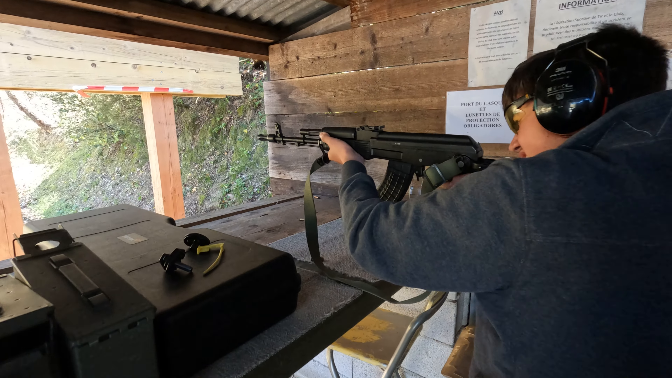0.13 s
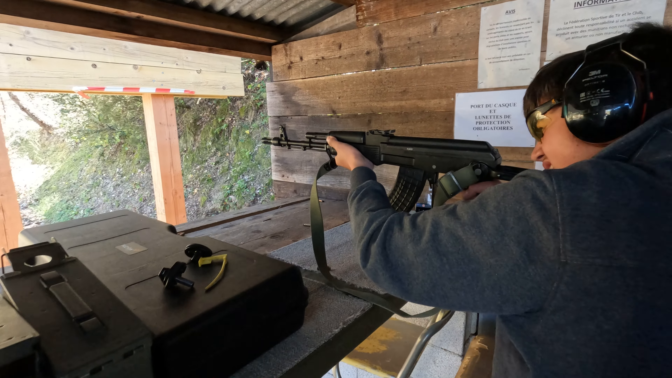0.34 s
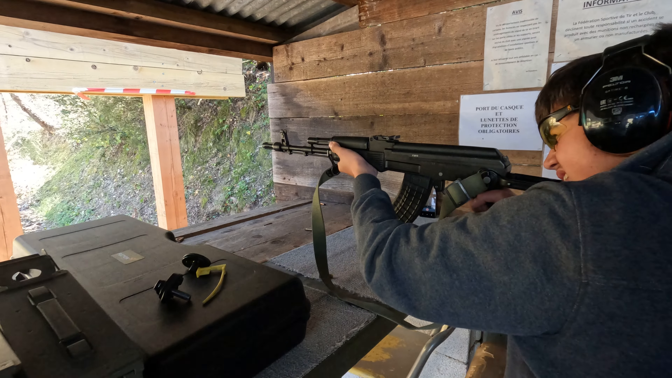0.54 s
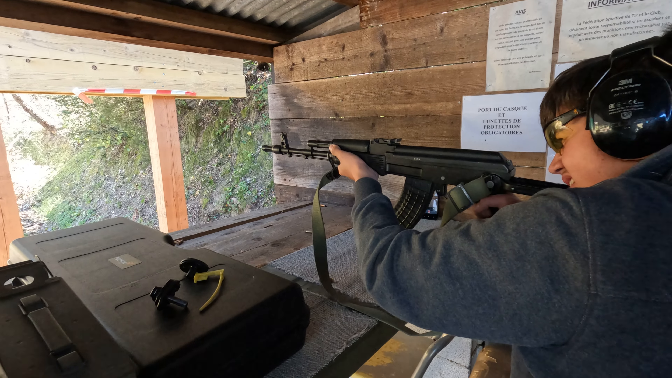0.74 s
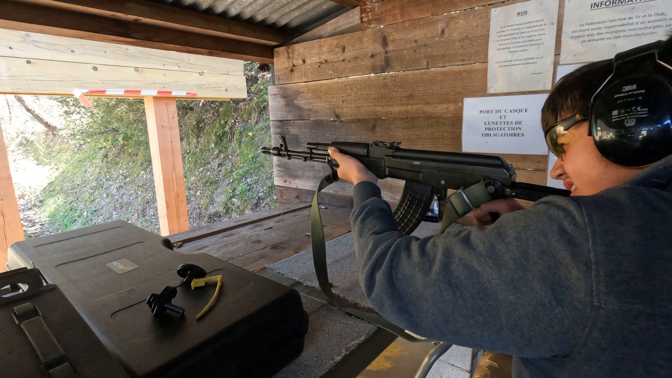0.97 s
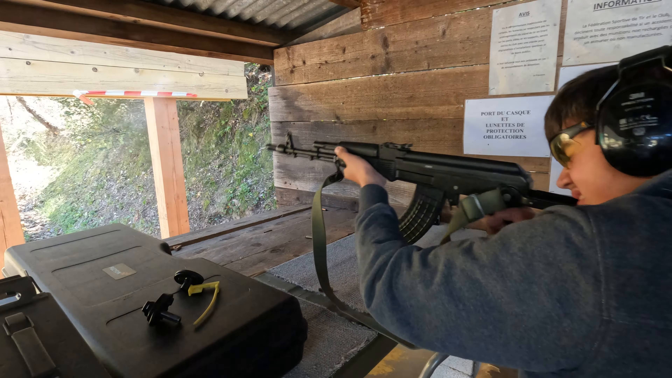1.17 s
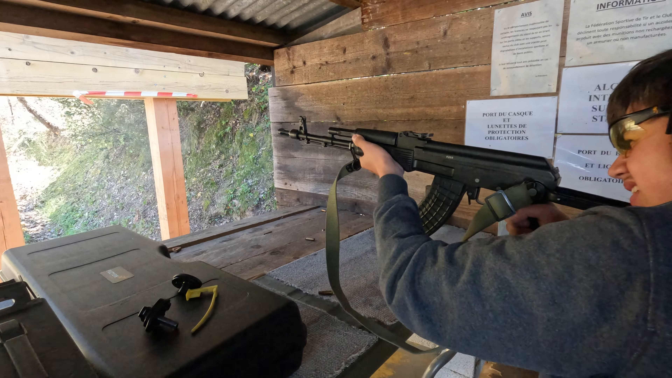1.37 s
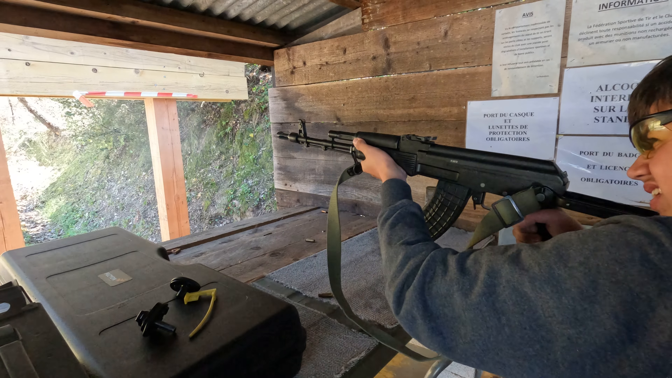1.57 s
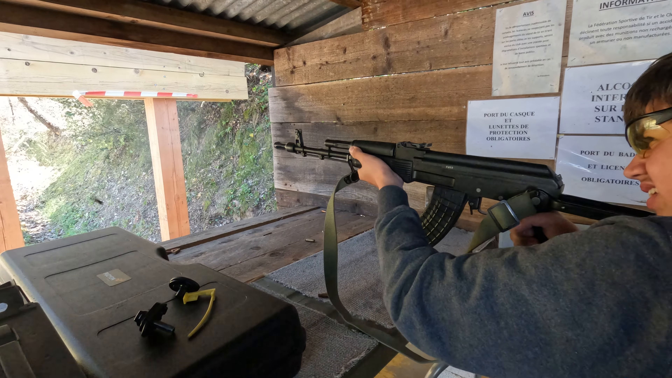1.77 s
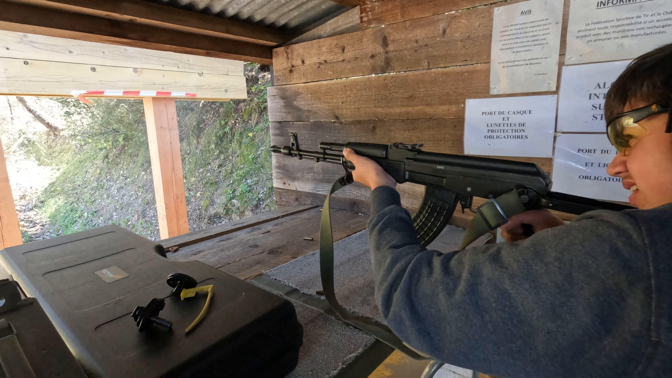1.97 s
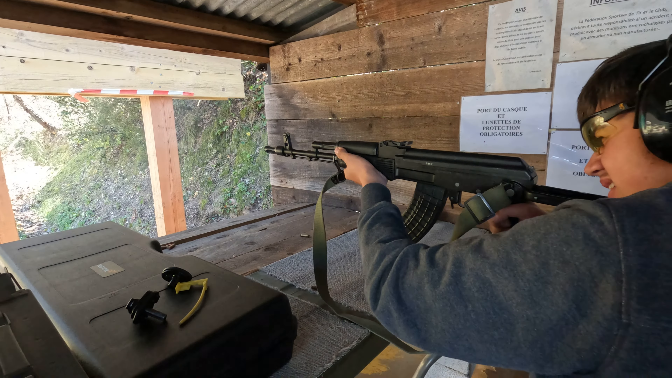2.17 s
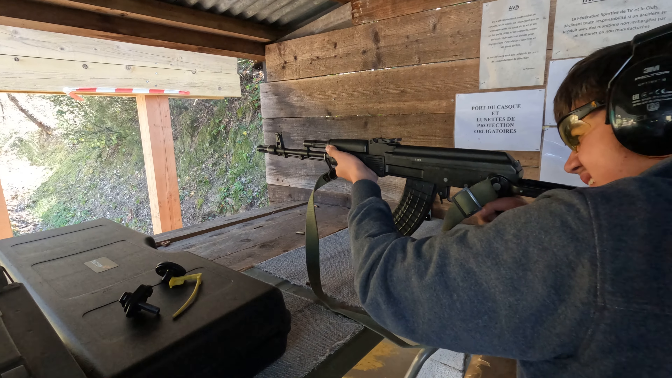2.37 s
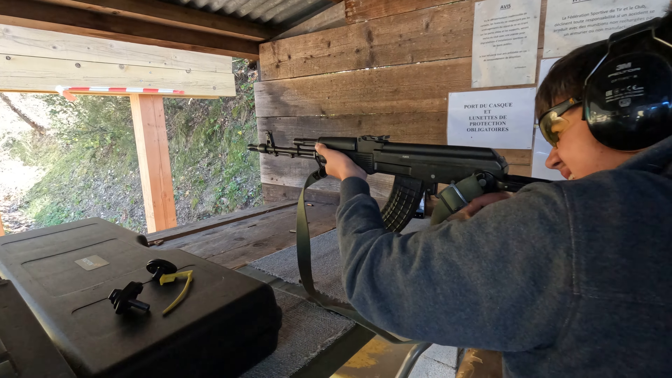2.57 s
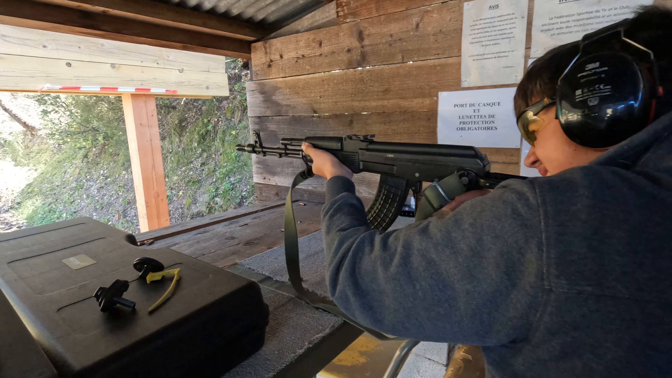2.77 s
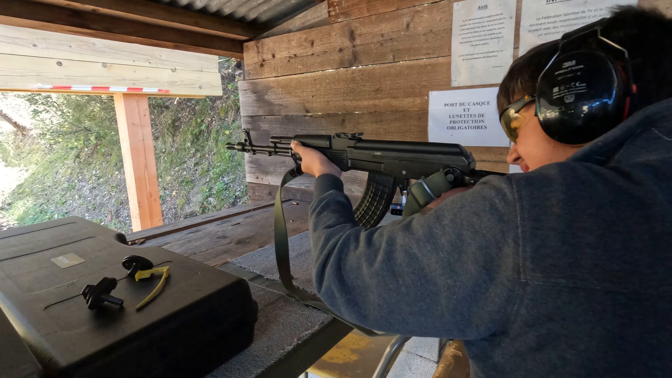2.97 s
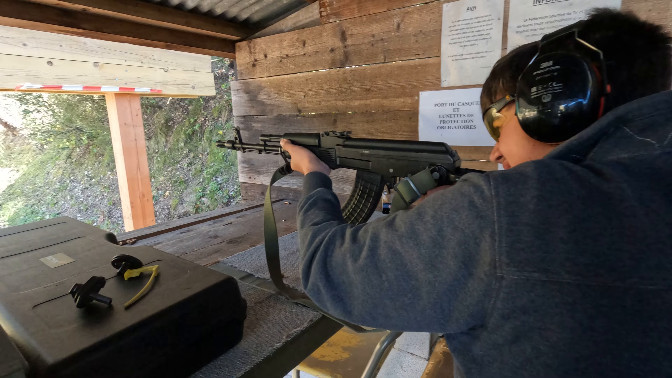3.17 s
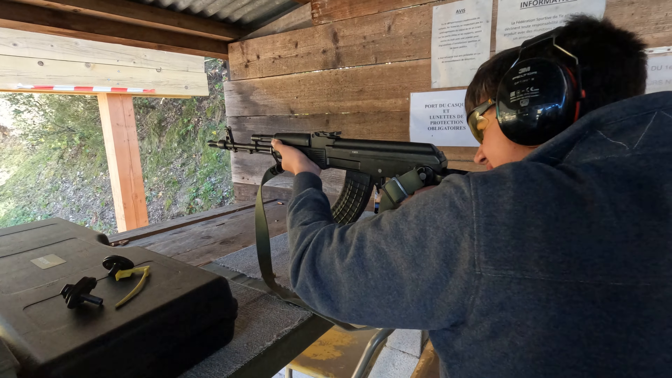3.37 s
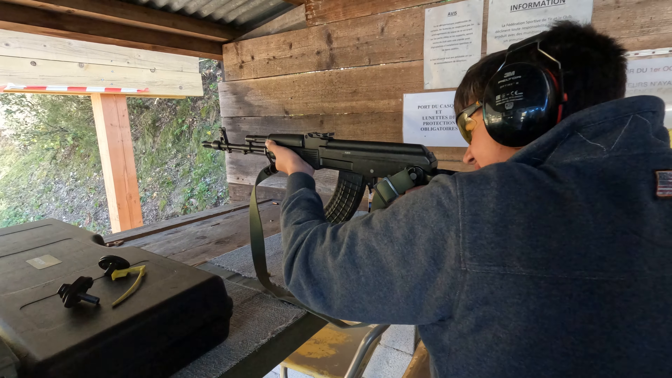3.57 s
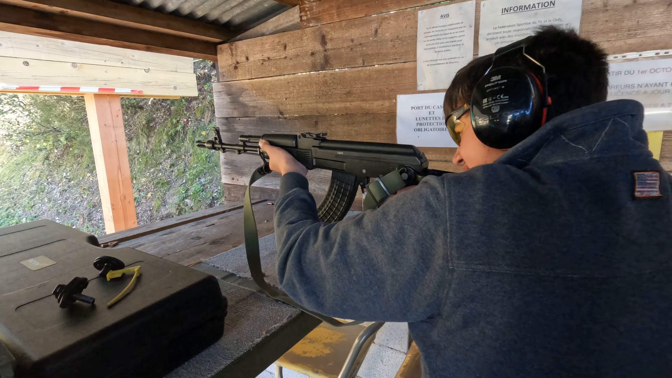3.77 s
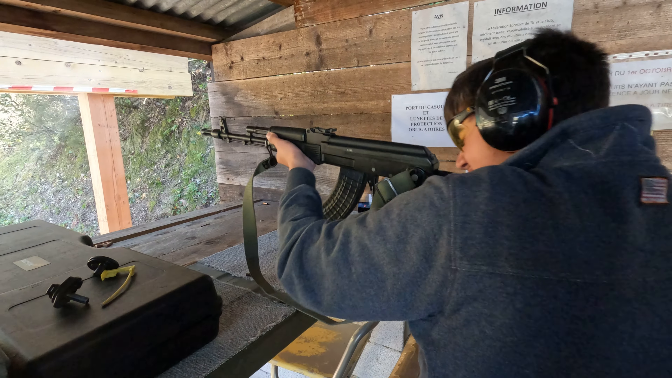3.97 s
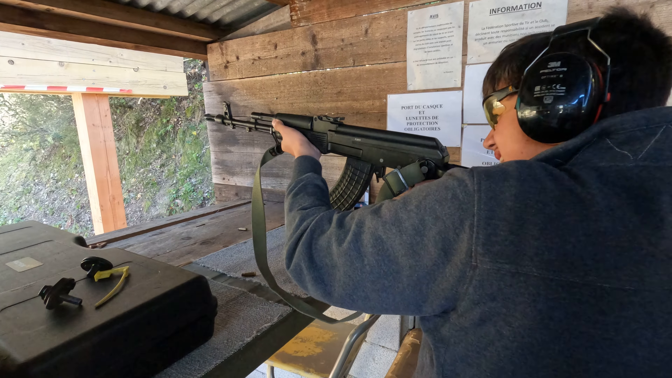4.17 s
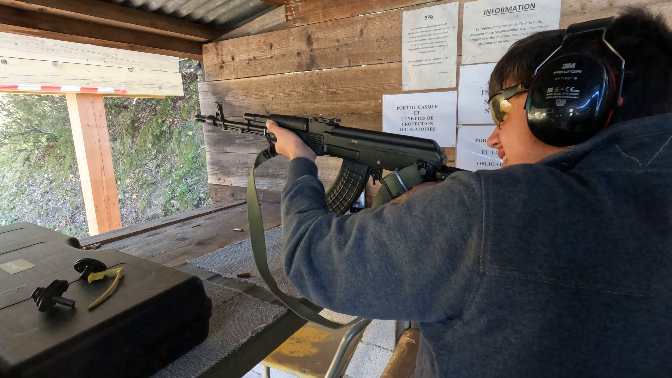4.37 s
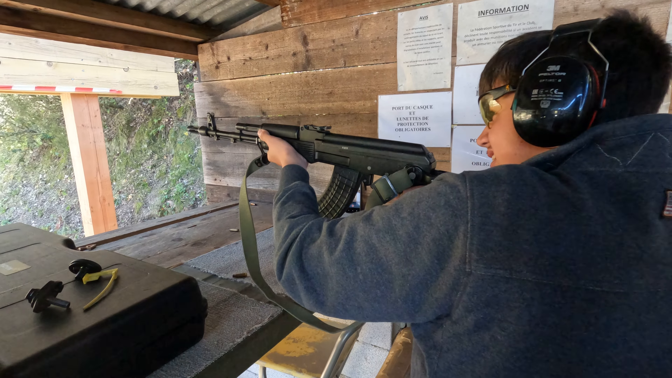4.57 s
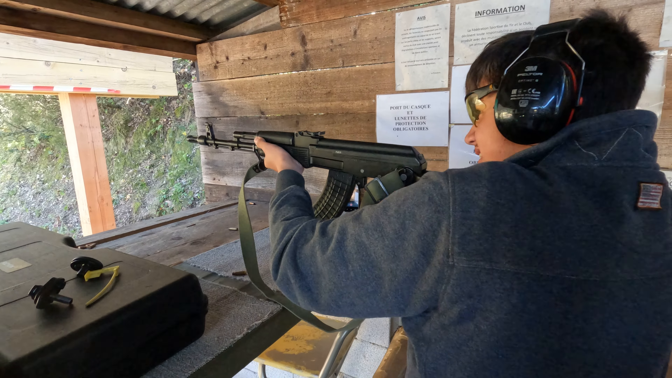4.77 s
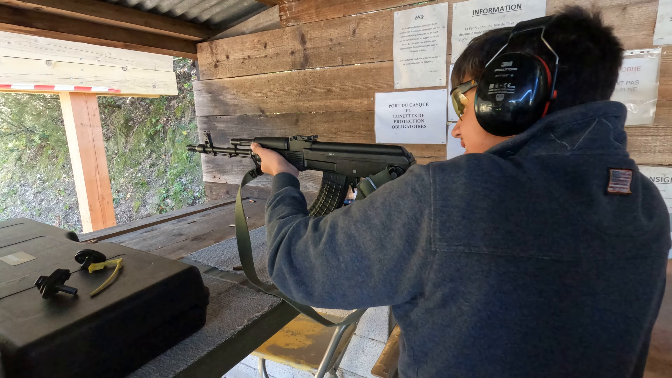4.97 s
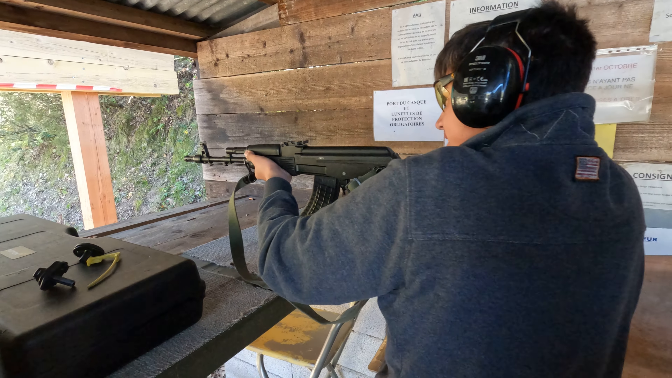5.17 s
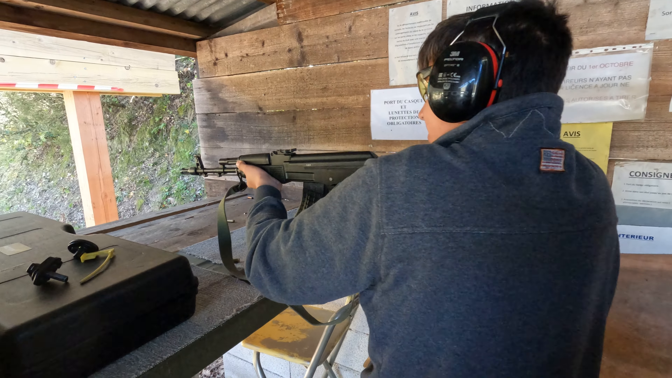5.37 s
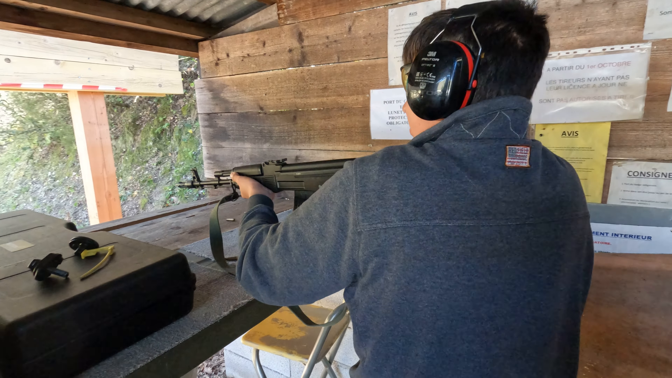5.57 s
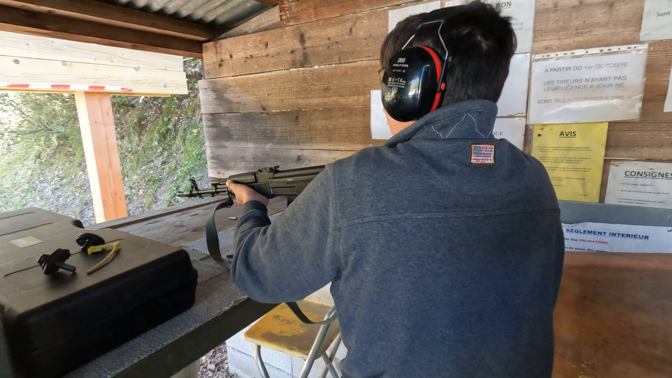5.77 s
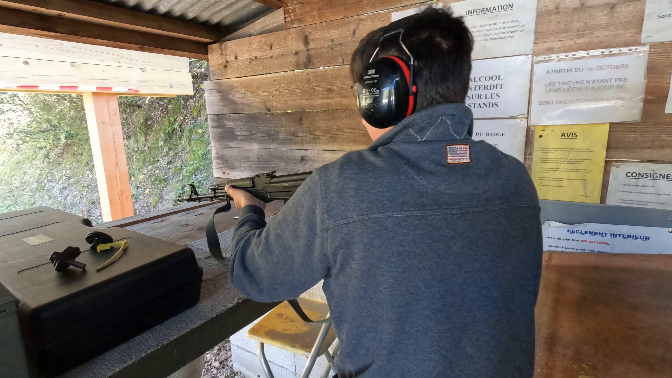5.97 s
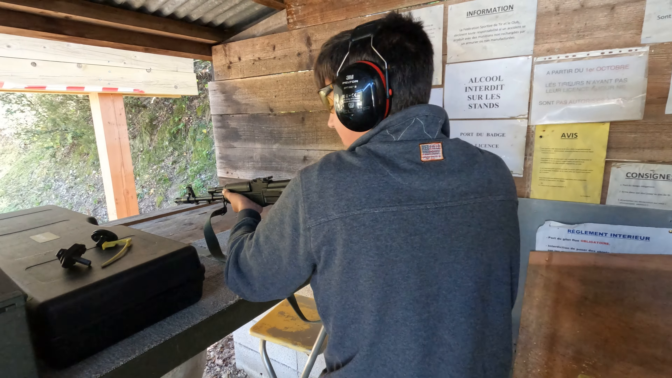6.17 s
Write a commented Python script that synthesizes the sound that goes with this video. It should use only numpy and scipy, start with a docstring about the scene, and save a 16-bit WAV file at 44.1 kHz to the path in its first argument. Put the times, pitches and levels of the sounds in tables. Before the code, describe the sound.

Two deafening rifle blasts nearly three seconds apart distort the microphone, ring a wooden shed and roll away outdoors, followed by brass tinkles and metallic clacks.

```python
"""Wooden range shed under a tin roof: a rifle fires twice; the blast fills the shed, then returns from the slope.
Blasts, far noise and wind are noise shaped in bands; resonators ring the shed, trigger and brass.
Spent cases tinkle and roll on the ground, and the trigger clacks as it resets.
Wind buffets the microphone, a dull outdoor background sinks and swells, and each blast overloads the microphone.
"""
import sys
import numpy as np
from scipy import signal
from scipy.io import wavfile

SR = 44100
rng = np.random.default_rng(int(sys.argv[2]) if len(sys.argv) > 2 else 0)


def int16_out(signal):
    """Quantize to a 16-bit WAV file."""
    q = np.round(np.clip(np.atleast_2d(signal).T, -1, 1) * 32767)
    wavfile.write(sys.argv[1], SR, q.astype(np.int16))


def undo_db(level):
    """Turn decibels back into plain size, where 20 dB means ten times bigger."""
    steps = np.asarray(level, float) / 20
    return 10 ** steps


N = 274302


def rms_one(x):
    """Scales to rms 1."""
    return x / np.sqrt(np.mean(x ** 2) + 1e-20)


def at_hz(points, hz):
    """Reads table columns at a pitch, linear in log f."""
    table = np.array(points, float)
    return [np.interp(np.log(hz), np.log(table[:, 0]), column) for column in table.T[1:]]


def drift(rate_hz, size=N):
    """Slow random walk about 0, rms 1: noise through a double pole at 1/40 of the sample rate."""
    r = np.exp(-80 * np.pi * rate_hz / SR)
    white = rng.standard_normal(size // 40 + 2002)
    slow = signal.lfilter([1], [1, -2 * r, r * r], white)[2000:]
    return np.interp(np.arange(size) / 40, np.arange(len(slow)), rms_one(slow))


BAND_EDGES_HZ = 22 * 2 ** np.arange(0, 9.7, .28)
BUZZ_PERIOD_S, BUZZ_LASTS_S = 2 / 187.5, .044


def bands(size, buzz_share=0.):
    """Yields centre/Hz and noise per band; buzz_share is the power share that repeats at the start."""
    settle = 4000   # samples for the filters to settle
    at = np.arange(size + settle)
    white = rng.standard_normal((2, len(at)))
    fade = np.clip((settle + BUZZ_LASTS_S * SR - at) / 200, 0, 1)
    share = np.clip(buzz_share, 0, 1) * fade
    repeated = white[:, at % round(BUZZ_PERIOD_S * SR)]
    white = np.sqrt(share) * repeated + np.sqrt(1 - share) * white[:, ::-1]
    for k, (low, high) in enumerate(zip(BAND_EDGES_HZ, BAND_EDGES_HZ[1:])):
        sos = signal.butter(3, [low, high], "band", fs=SR, output="sos")
        # alternate sources: neighbours are unrelated
        yield np.sqrt(low * high), signal.sosfilt(sos, white[k % 2])[settle:]


def swell(t, rise_s, t60_s, held_s=0.):
    """Envelope: cubed exponential rise, times a hold and a decay of 60 dB per t60."""
    t = np.maximum(t, 0)
    decay = undo_db(-60 * np.maximum(t - held_s, 0) / t60_s)
    return (1 - np.exp(-t / rise_s)) ** 3 * decay


def resonance(x, hz, width_hz):
    """Two-pole peak of gain 1."""
    r = np.exp(-np.pi * width_hz / SR)
    zeros = np.array([1, 0, -1]) * (1 - r * r) / 2
    return signal.lfilter(zeros, [1, -2 * r * np.cos(2 * np.pi * hz / SR), r * r], x)


def add(out, s, sound):
    """Mixes a sound in at a time/s."""
    start = round(s * SR)
    out[start:start + len(sound)] += sound[:N - start]


# far noise spectrum before tilt: f/Hz, level/dB per Hz
OUTDOOR_SPECTRUM = [(59, -31.5), (100, 0), (310, -4), (352, -4.5), (942, -10.5), (5480, -34),
                    (12200, -50.5), (15000, -61)]
EARLIER_SHOT_S = -1.613   # a shot before the scene begins
HUSH_AFTER_S, HUSHED_DB = 1.357, -61   # quietest point after a shot; 300-1500 Hz level
SINK_DB_PER_S, SWELL_DB_PER_S = 5, 8   # before and after the hush
DULL_DB_PER_OCTAVE, CLEARS_S = -8, 1.6   # extra tilt at the shot, gone after CLEARS_S
CLEAR_DB_PER_OCTAVE = -0.63   # tilt that stays


def outdoors():
    """Smooth far noise; after each shot it sinks and clears from dull, then swells back."""
    t = np.arange(N) / SR
    fired_s = np.array([EARLIER_SHOT_S] + [s for s, _ in SHOTS])
    since_s = t - fired_s[np.searchsorted(fired_s, t, "right") - 1]
    sinking_db = SINK_DB_PER_S * (HUSH_AFTER_S - since_s)
    swelling_db = SWELL_DB_PER_S * (since_s - HUSH_AFTER_S)
    level_db = HUSHED_DB + np.maximum(sinking_db, swelling_db)
    tilt = CLEAR_DB_PER_OCTAVE + DULL_DB_PER_OCTAVE * np.maximum(1 - since_s / CLEARS_S, 0)
    out = np.zeros(N)
    for hz, noise in bands(N):
        octaves = max(np.log2(hz / 700), 0)
        out += noise * undo_db(at_hz(OUTDOOR_SPECTRUM, hz)[0] + tilt * octaves + drift(17.0))
    middle = signal.sosfilt(signal.butter(2, [300, 1500], "band", fs=SR, output="sos"), out)
    return undo_db(level_db) * out / np.std(middle)


# gusts: t/s, level/dB before random drift
GUSTS = [(0, -49.5), (.25, -54.5), (.39, -45.5), (.476, -36.5), (.56, -48.5), (.83, -50), (1.044, -34.5),
         (1.23, -40), (1.8, -51), (2.3, -49.5), (2.79, -49.5), (3.01, -39.5), (3.24, -49.5), (3.65, -56),
         (3.98, -45), (4.65, -53), (5.0, -49.5), (5.36, -50), (5.42, -61.5), (5.6, -54.5), (5.71, -49.5),
         (6.056, -45), (6.22, -47.5)]
# wind spectrum: f/Hz, level/dB per Hz
WIND_SPECTRUM = [(20, -2.5), (40, 1), (80, -7.5), (160, -16.5), (320, -31.5), (640, -55)]


def wind():
    """Lumpy low pressure at the microphone port: noise below 600 Hz under a gust curve."""
    gust_s, gust_db = np.transpose(GUSTS)
    level_db = np.interp(np.arange(N) / SR, gust_s, gust_db)
    out = np.zeros(N)
    for hz, noise in bands(N):
        if hz < 600:
            out += noise * undo_db(at_hz(WIND_SPECTRUM, hz)[0] + 2.0 * drift(25.0))
    return undo_db(level_db + 2.5 * drift(6.0)) * rms_one(out)


# cases touching ground: t/s, knock level/dB, knock tilt above 3500 Hz/dB per octave,
# low ring level/dB, high rings level/dB
CASE_TOUCHES = [(.27, -88, -5, -90, -81), (1.758, -38, -16.5, -75.5, -61), (2.505, -57.5, 1, -53.5, -63.5),
                (2.985, -59.5, -5.5, -56, -75), (3.057, -77.5, -3, -76, -84), (3.183, -62.5, -13, -51, -95),
                (3.300, -78, -15, -60, -84), (3.437, -69.5, -5, -62.5, -73), (3.547, -67.5, -7.5, -71, -73),
                (3.596, -67.5, 0, -74.5, -85.5), (3.671, -77.5, -9.5, -57, -67),
                (3.749, -64.5, -12, -68, -67), (4.890, -63.5, -8, -80, -67), (5.62, -81.5, 0, -90.5, -85),
                (5.875, -85, -5.5, -90, -81)]
# brass modes of the first case: f/Hz, width per resonator/Hz, t60/s, relative level/dB
BRASS_MODES = [(2297, 230, 0.23, 0), (8870, 55, .3, -1), (14970, 90, .25, -4.5)]
# knock spectrum before tilt: f/Hz, level/dB per Hz
KNOCK_SPECTRUM = [(400, -4), (700, 0.5), (1500, -8.5), (2300, -0.5), (3300, -1)]
KNOCK_T60_3KHZ_S = 0.24
SECOND_CASE_PITCH = .98   # pitch ratio, case of the second shot


def cases():
    """Each touch: a rattling knock whose treble dies first, while the brass tube rings on."""
    before_s = .02
    out, t = np.zeros(N), np.arange(int(.42 * SR)) / SR - before_s
    lead_in = undo_db(-13) * np.exp(-np.abs(t) / .007)   # faint noise swells in before the hit
    for s, knock_db, tilt, low_db, high_db in CASE_TOUCHES:
        knock = np.zeros(len(t))
        for hz, noise in bands(len(t)):
            if hz > 400:
                band_db = at_hz(KNOCK_SPECTRUM, hz)[0] + tilt * max(np.log2(hz / 3500), 0)
                hit = swell(t, 0.00065, KNOCK_T60_3KHZ_S * (3000 / hz) ** 0.56)
                knock += noise * undo_db(band_db) * (lead_in + hit)
        knock /= np.std(knock[(t > 0) & (t < .03)])
        sound = undo_db(knock_db + 1.6 * drift(170.0, size=len(t))) * knock
        pitch = SECOND_CASE_PITCH if s > SHOTS[1][0] else 1
        for (hz, width_hz, t60_s, mode_db), ring_db in zip(BRASS_MODES, [low_db, high_db, high_db]):
            # tumbling roughens the ring: noise through two resonators
            spin = rng.standard_normal(len(t))
            for _ in range(2):
                spin = resonance(spin, hz * pitch, width_hz)
            sound += undo_db(ring_db + mode_db) * swell(t, 0.0016, t60_s) * rms_one(spin)
        add(out, s - before_s, sound)
    return out


# shots: t/s, level/dB
SHOTS = [(1.239, -1), (3.994, -1)]
# blast in the shed, before shot level: f/Hz, level/dB, held/s, t60/s
BLAST = [(45, -35.5, 0.064, 0.64), (81, -29, .09, 0.63), (130, -18.5, 0.085, .33), (250, -17.5, .10, 0.17),
         (500, -15.5, .06, .32), (1020, -17, 0.067, .25), (2100, -20, 0.051, .3), (3600, -17.5, .025, .27),
         (6700, -24, .04, 0.23), (11300, -33.5, 0.024, .28), (14940, -45.5, .055, .22)]
# returns: delay/s, level re blast/dB, build-up/s, held/s, t60 at lowest pitch/s, air loss/dB per kHz
ECHOES = [(0.129, -24.5, .003, 0.0092, .1, -1), (.168, -24, 0.0058, .01, 0.35, 3.5),
          (0.188, -33.5, 0.0061, 0.14, 0.94, 2), (.268, -34.5, 0.0043, 0.011, .2, 0.9),
          (0.333, -24.5, 0.0014, 0.015, 0.32, 5)]
# roof sheets and planks ringing with the blast: f/Hz, width/Hz, lift/dB
SHED_MODES = [(73.4, 3.8, 9.5), (88, 7.2, 4.5), (137, 20, 2.5), (233, 25, 8), (289, 4.6, 3), (514, 46, 7),
              (743, 30, 4), (890, 28, 4), (1017, 22, 3.5), (1540, 370, 1), (2570, 200, 3.5), (3400, 770, 4),
              (4950, 180, 2.5)]
# long valley tail, before shot level: f/Hz, level/dB
VALLEY = [(45, -44.5), (80, -31.5), (130, -38.5), (250, -39), (500, -39), (1030, -36.5), (2090, -43),
          (3700, -54), (6700, -67), (14940, -88.5)]
# shed panels booming alike at every shot, before shot level:
# delay/s, f/Hz, level/dB, build-up/s, t60/s
BOOMS = [(.008, 137.3, -5.5, .008, .16), (.075, 76, -12, .018, .35), (.16, 244, -23.5, .02, .7)]
BUILD_UP_1KHZ_S, BUILD_UP_POWER = .022, -.25   # lows build up more slowly
VALLEY_LOW_T60_S, VALLEY_DULL_HZ = 1.45, 5300   # above this pitch the tail dies fast
BUZZ_SHARE = .93   # a short buzz, repeating every 10.7 ms, at each blast's start


def shots():
    """Dense reflections build up and die band by band; slope echoes and a long valley tail follow."""
    out, t = np.zeros(N), np.arange(int(1.6 * SR)) / SR
    for s, level_db in SHOTS:
        blast = np.zeros(len(t))
        for hz, noise in bands(len(t), buzz_share=BUZZ_SHARE):
            band_db, held_s, t60_s = at_hz(BLAST, hz)
            shape = swell(t, BUILD_UP_1KHZ_S * (hz / 1000) ** BUILD_UP_POWER, t60_s, held_s)
            for delay_s, echo_db, rise_s, echo_held_s, echo_t60_s, loss_db in ECHOES:
                echo = swell(t - delay_s, rise_s, echo_t60_s / (1 + hz / 6000), echo_held_s)
                shape = np.hypot(shape, undo_db(echo_db - loss_db * hz / 1000) * echo)   # powers add
            tail = swell(t, .04, VALLEY_LOW_T60_S / (1 + (hz / VALLEY_DULL_HZ) ** 2))
            shape = np.hypot(undo_db(band_db) * shape, undo_db(at_hz(VALLEY, hz)[0]) * tail)
            steady = noise / np.std(noise[SR // 10:])   # level taken past the buzz
            blast += shape * steady * undo_db(1.7 * drift(28.0, size=len(t)))
        for hz, width_hz, lift_db in SHED_MODES:
            blast = blast + (undo_db(lift_db) - 1) * resonance(blast, hz, width_hz)
        for delay_s, hz, boom_db, rise_s, t60_s in BOOMS:
            tone = np.sin(2 * np.pi * hz * (t - delay_s))
            blast += undo_db(boom_db) * swell(t - delay_s, rise_s, t60_s) * tone
        add(out, s, undo_db(level_db) * blast)
    return out


# trigger resets: t/s, overall level/dB, low thump re overall/dB, ringing re contact/dB
RESETS = [(2.576, -21, -24, 6.5), (5.378, -21, -7.5, 8)]
# contact spectrum: f/Hz, level/dB per Hz
RESET_SPECTRUM = [(700, -22), (1000, -3), (1800, -3.5), (2800, -1.5), (5000, -6.5), (9000, -14.5),
                  (12500, -19), (15500, -29)]
# metal modes: f/Hz, width/Hz, level before ringing/dB
RESET_MODES = [(940, 130, 7), (1373, 110, -1), (1720, 107, 4), (2776, 104, 1), (3670, 50, -8),
               (3960, 93, -6.5), (5230, 44, -2.5)]
RESET_T60_S, SECOND_CONTACT_S = .13, 0.012


def resets():
    """Faint noise swells in, then two quick metal contacts ring the receiver and fade in the shed."""
    before_s = .03
    out, t = np.zeros(N), np.arange(int(.33 * SR)) / SR - before_s
    lead_in = undo_db(-17) * np.exp(-np.abs(t) / 0.0096)
    first = swell(t, 0.001, RESET_T60_S)
    second = undo_db(-20.5) * swell(t - SECOND_CONTACT_S, 0.0028, 0.13)
    shed = undo_db(-24.5) * swell(t, 0.023, 0.37)
    shape = lead_in + first + second + shed
    steep = signal.butter(6, 800, "high", fs=SR, output="sos")   # a small part sends out little bass
    for s, level_db, thump_db, ring_db in RESETS:
        noise = rms_one(sum(undo_db(at_hz(RESET_SPECTRUM, hz)[0]) * n for hz, n in bands(len(t))))
        contact = shape * noise * undo_db(1.4 * drift(120.0, size=len(t)))
        rung = sum(undo_db(db + ring_db) * resonance(contact, hz, width) for hz, width, db in RESET_MODES)
        # noise peaks stand above its mean level
        clack = undo_db(-11.5) * signal.sosfilt(steep, contact + rung)
        thump = undo_db(thump_db) * swell(t + 0.013, 0.0024, 0.046) * np.sin(2 * np.pi * 200 * t)
        add(out, s - before_s, undo_db(level_db) * (clack + thump))
    return out


ROLL_MIDDLE_S, ROLL_HALF_LENGTH_S, ROLL_DB = 2.78, 0.15, -69   # half length to 1/e; level at the middle
ROLL_HZ, ROLL_WIDTH_HZ = 3194, 670


def rolling():
    """A case rolls to rest: dense tiny contacts excite its broad resonance."""
    stroke = np.exp(-((np.arange(N) / SR - ROLL_MIDDLE_S) / ROLL_HALF_LENGTH_S) ** 2)
    grit = rng.standard_normal(N) * undo_db(1.5 * drift(90.0))
    return undo_db(ROLL_DB) * stroke * rms_one(resonance(grit, ROLL_HZ, ROLL_WIDTH_HZ))


def scene():
    """All sources, alike in both channels."""
    mono = outdoors() + wind() + cases() + shots() + resets() + rolling()
    return np.array([mono, mono])


def roll_off(x):
    """The treble ends steeply here."""
    return signal.sosfilt(signal.butter(12, 15700, fs=SR, output="sos"), x)


def record(dry):
    """Microphone overload flattens the loudest swings; the top treble is stronger on the left."""
    flat = np.clip(1.499 * np.tanh(dry / 1.665), -.99, .99)
    top = signal.sosfiltfilt(signal.butter(3, 11000, "high", fs=SR, output="sos"), flat)
    mix = flat + .4 * top * [[1], [-1]]
    return roll_off(mix)


dry = scene()
out = record(dry)
int16_out(out)
```